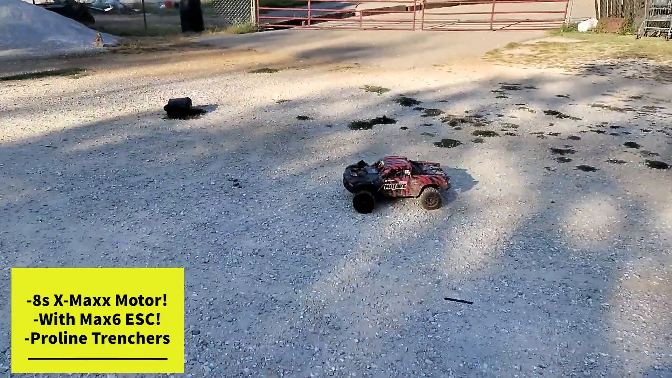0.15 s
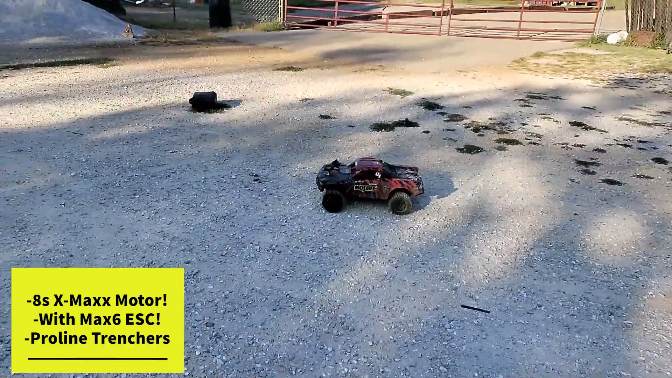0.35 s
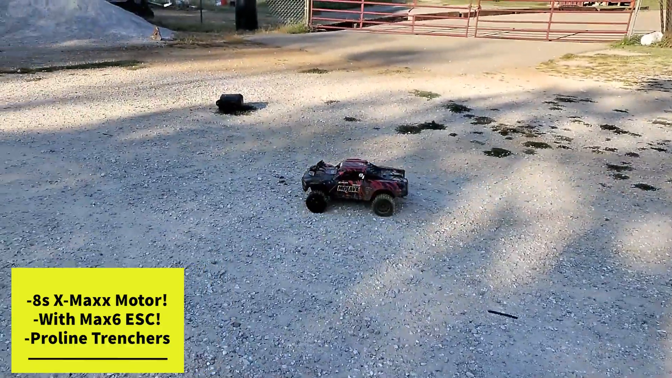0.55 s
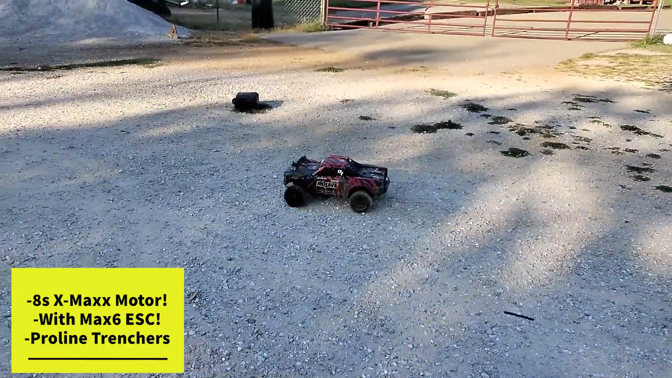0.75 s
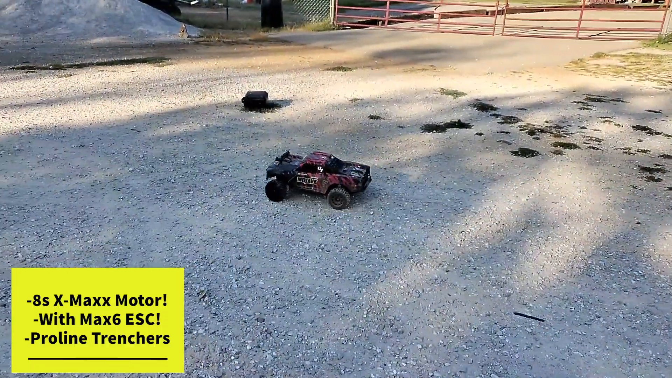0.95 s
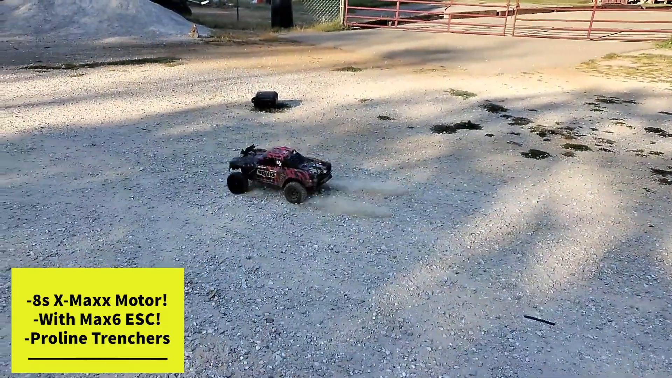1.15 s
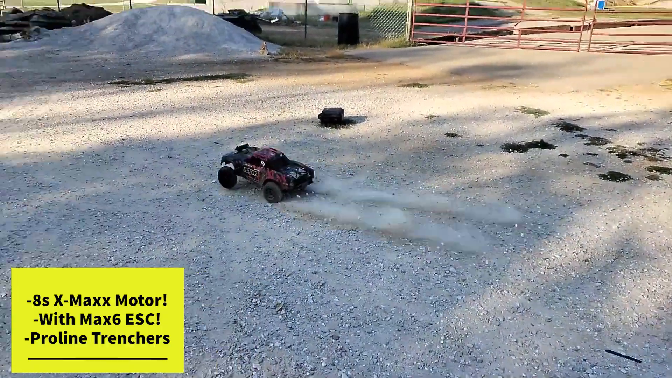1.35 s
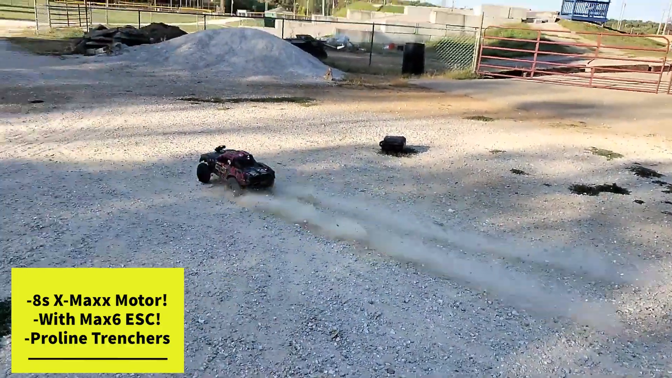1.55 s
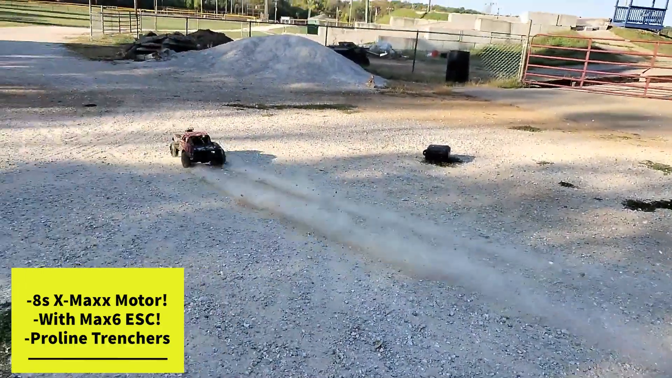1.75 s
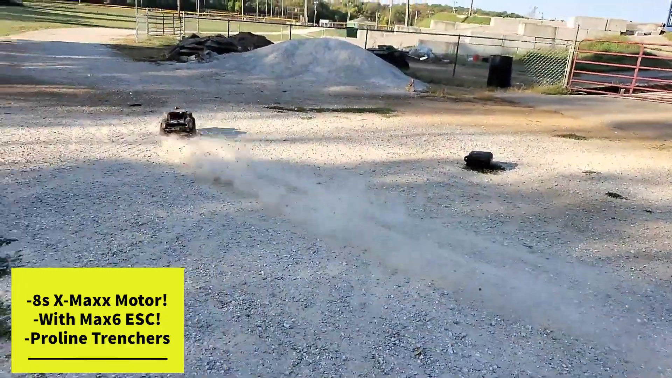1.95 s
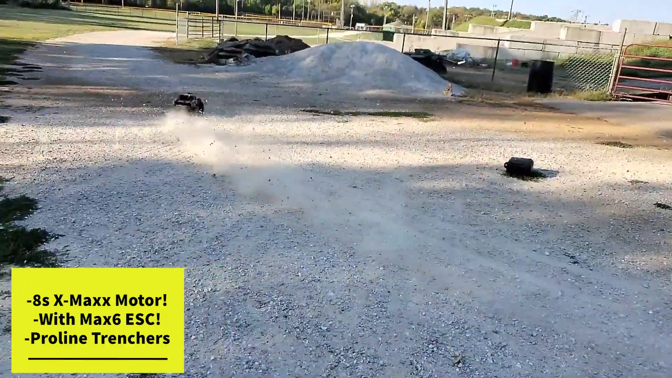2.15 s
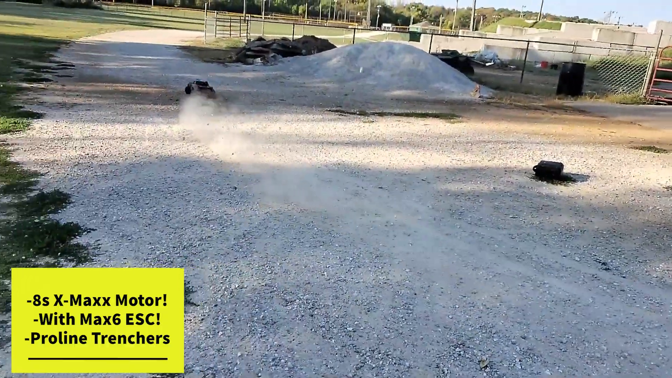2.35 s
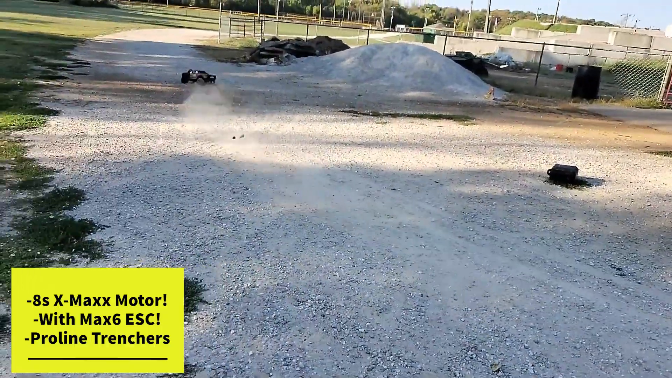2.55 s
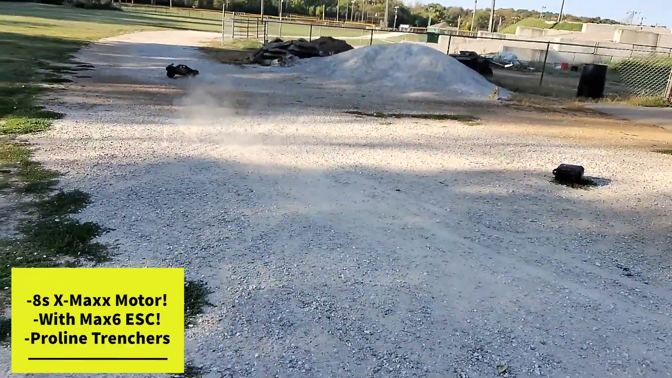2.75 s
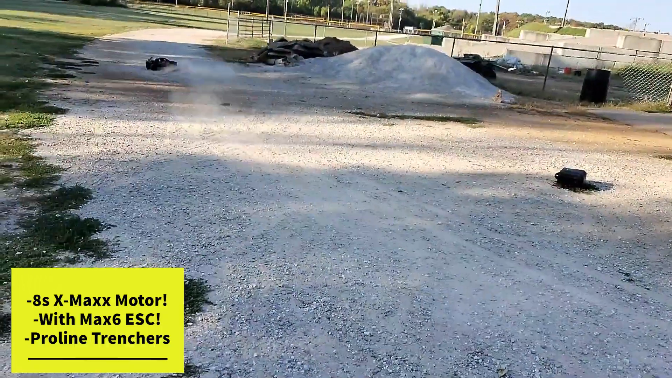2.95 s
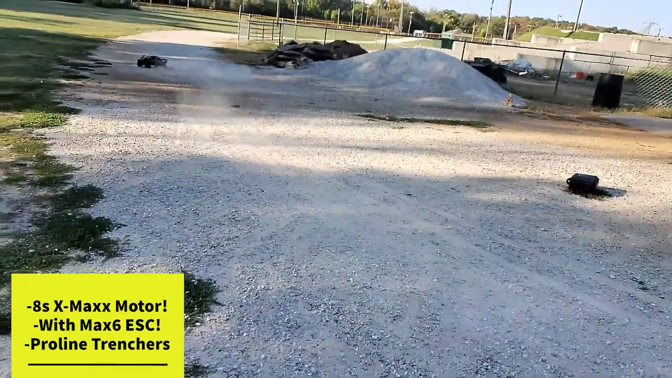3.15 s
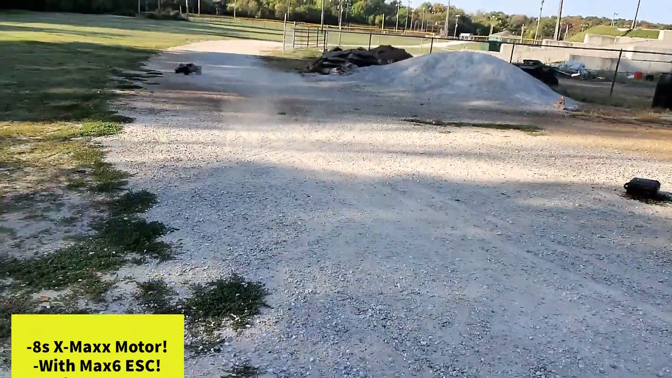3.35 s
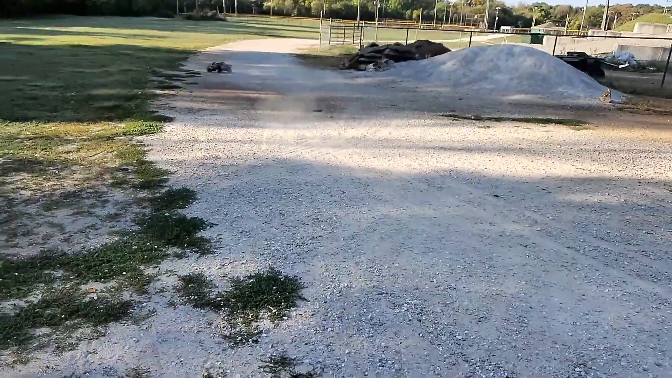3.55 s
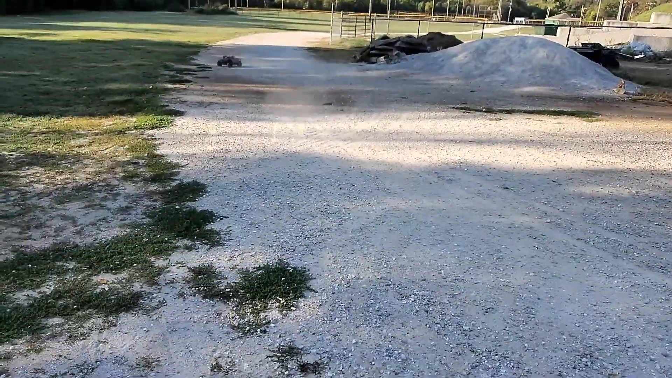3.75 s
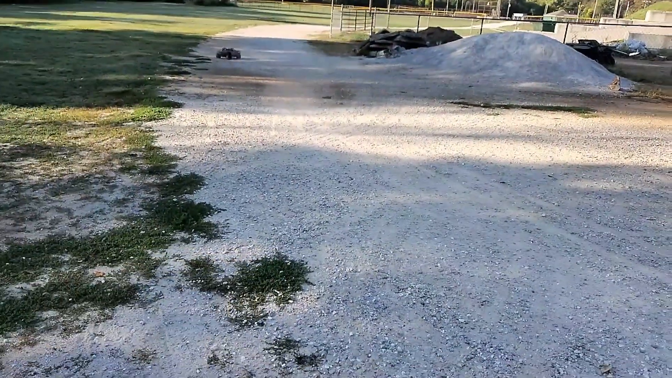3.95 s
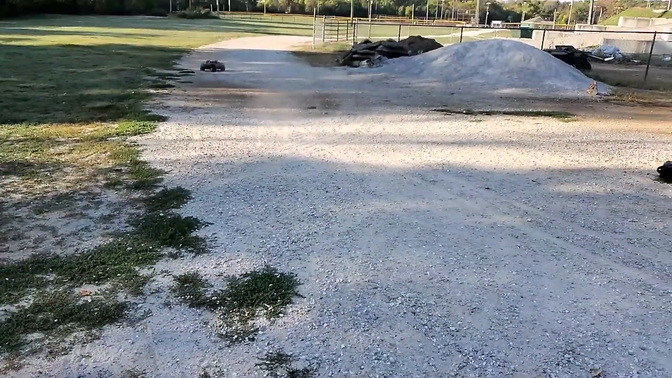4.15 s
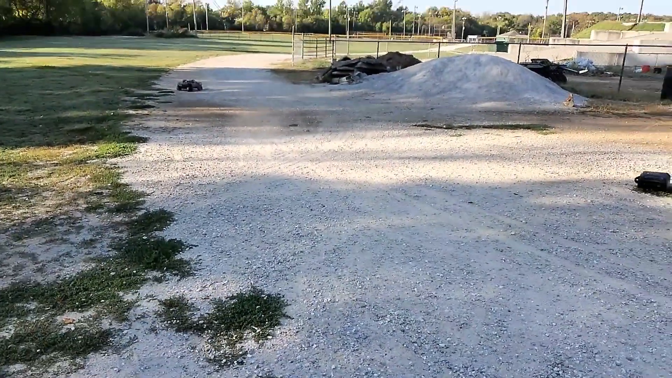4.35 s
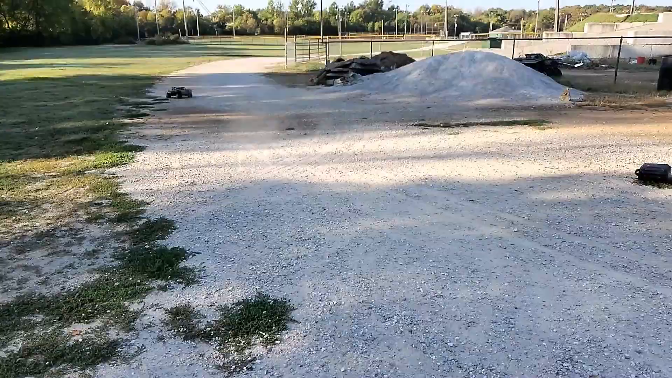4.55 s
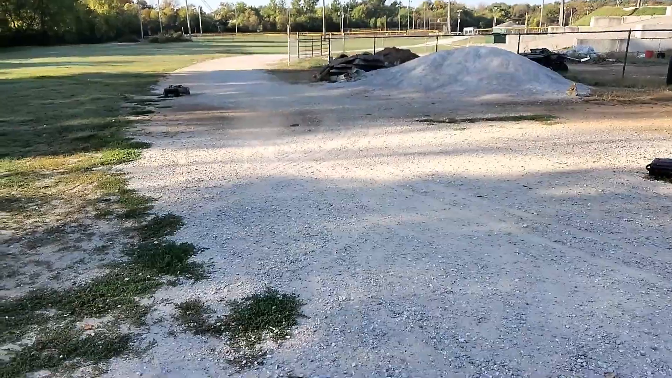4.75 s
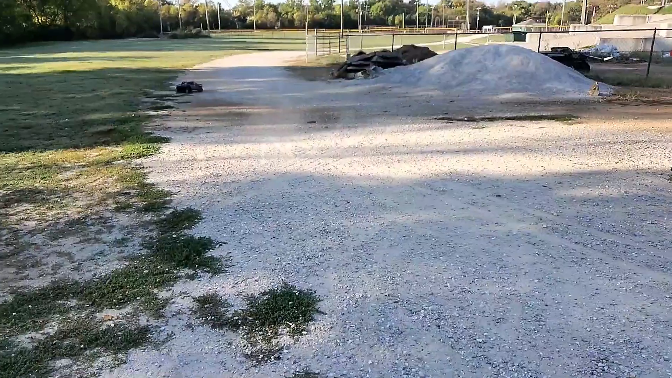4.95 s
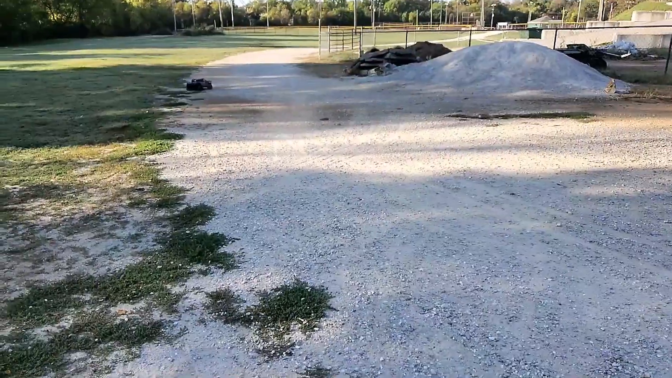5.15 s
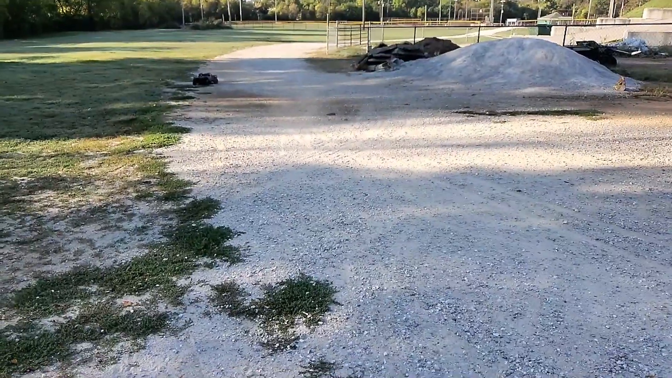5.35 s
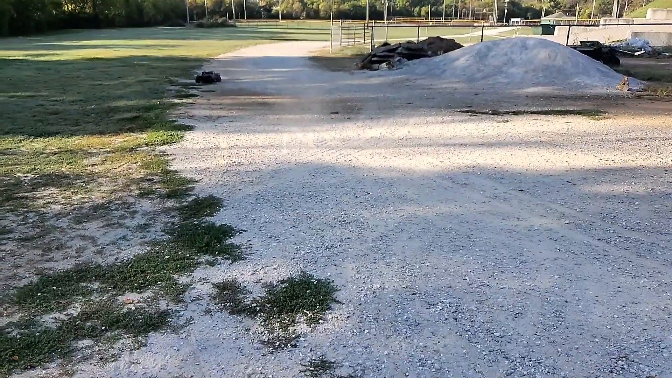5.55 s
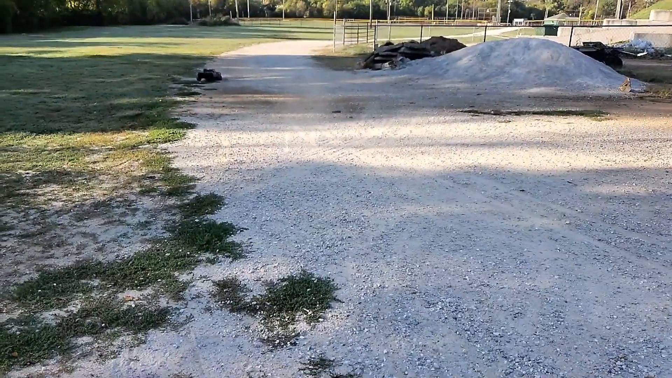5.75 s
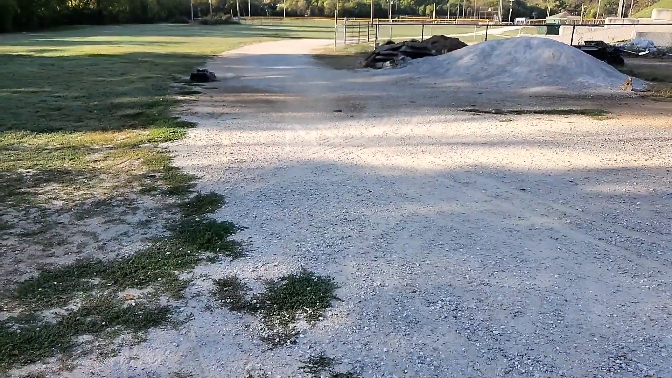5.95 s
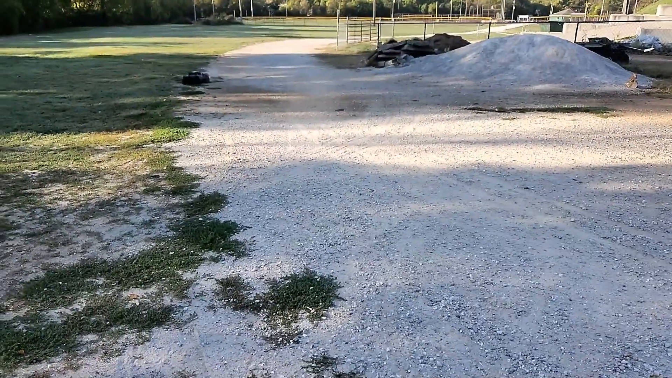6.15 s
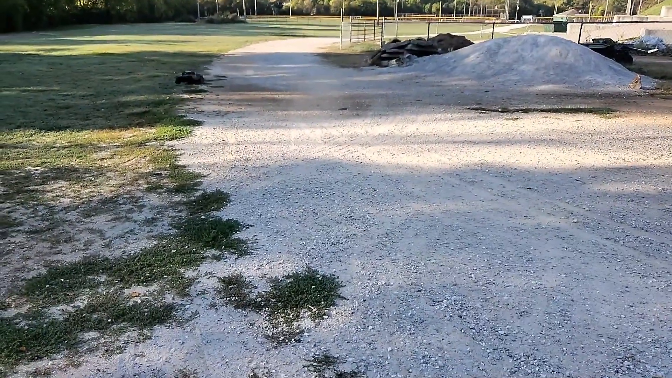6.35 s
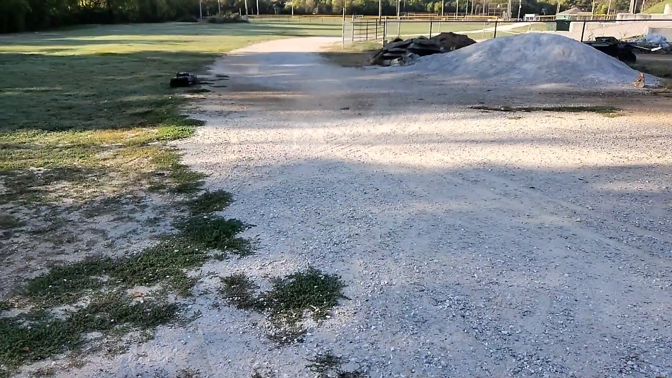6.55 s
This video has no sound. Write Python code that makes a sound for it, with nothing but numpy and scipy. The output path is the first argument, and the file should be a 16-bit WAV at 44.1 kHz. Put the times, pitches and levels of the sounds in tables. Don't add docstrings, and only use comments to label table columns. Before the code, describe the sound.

A brief skid and clacking stones open close to the phone, with quiet rolling and a thin insect buzz. About a second in, hollow tyres spin hard, spraying gravel for a second while the gears whine upward. Grit rains and bright pebbles click close by. Far away, small throttle bursts crunch with dull clacks over low traffic rumble in the open air.

```python
import sys
import numpy as np
from scipy import signal
from scipy.fft import rfft, irfft
from scipy.io import wavfile
from scipy.ndimage import uniform_filter1d

SR = 44100
rng = np.random.default_rng(int(sys.argv[2]) if len(sys.argv) > 2 else 0)


def put_to_file(sound):
    columns = np.atleast_2d(sound).T
    safe = np.clip(columns, -1, 1)
    whole_steps = np.round(safe * 32767)
    wavfile.write(sys.argv[1], SR, whole_steps.astype(np.int16))


def gain_from_db(level_db):
    decades = np.asarray(level_db, float) / 20
    return 10 ** decades


N = 291060
TIME = np.arange(N) / SR
HZ = np.fft.rfftfreq(N, 1 / SR) + 1

# (time [s], crunch level [dB])
WHEELSPIN = [(0.95, -63.5), (1.02, -31), (1.28, -25.5), (1.4, -26.5), (1.6, -25.5), (1.9, -27.5),
             (2.08, -36), (2.19, -69.5), (2.25, -80)]
# (time [s], crunch level [dB])
ROLLING = [(0.0, -49), (0.5, -46), (0.95, -46.5), (2.0, -41), (2.7, -45.5), (3.15, -50), (3.55, -59),
           (4.2, -69), (4.9, -59), (5.5, -58), (6.6, -55)]
# (frequency [Hz], density [dB per Hz])
HOLLOW = [(50, -35), (110, -7), (220, 2.5), (300, -6), (380, -13.5), (600, -45)]


def unit(x):
    return x / np.sqrt(np.mean(x ** 2))


def across(table, column=1):
    table = np.array(table)
    return np.interp(np.log(HZ), np.log(table[:, 0]), table[:, column])


def along(table, off_db=None):
    s, *columns = np.transpose(table)
    return [np.interp(TIME, s, c, off_db, off_db) for c in columns]


def colour(x, spectrum):
    return unit(irfft(rfft(x) * gain_from_db(across(spectrum)), N))


def walk(rate):
    k = int(SR / rate)
    levels = np.repeat(rng.standard_normal(N // k + 1), k)
    return 1.61 * uniform_filter1d(uniform_filter1d(levels, k), k)[:N]


def held(s, length, db, rise_db_s, fall_db_s):
    down_db = rise_db_s * np.maximum(s - TIME, 0) + fall_db_s * np.maximum(TIME - s - length, 0)
    gain, on = np.zeros(N), down_db < 70
    gain[on] = gain_from_db(db - down_db[on])
    return gain


def power(*gains):
    return np.sqrt(sum(g ** 2 for g in gains))


def grains(rate, lump_db):
    luck = rng.random((3, N)) * SR / rate
    hit = luck < 1
    size = hit * rng.standard_normal((3, N))
    rarity = np.minimum(-np.log(luck[hit] + 1e-9), 4)
    size[hit] *= gain_from_db(np.broadcast_to(lump_db, (3, N))[hit] * rarity)
    steep = np.clip(lump_db * np.log(10) / 10, 0, 0.9)
    return size * np.sqrt((1 - steep) * SR / rate)


def ports(common, left, right, like=1.0):
    # (frequency [Hz], left minus right [dB], likeness [0-1], left leads by [rad])
    port_pair = [(61, 0, 0.96, 0), (200, -2, 1, -0.76), (600, -1, 0.92, -0.17), (1740, -6.5, 0.82, 1.52),
                 (2840, -1, 0.1, 3.5), (3820, 0.5, 0.1, 1), (4840, -5, 0.42, 3), (6460, -7, 0, 3.5),
                 (8000, -6, 0.44, 4), (8750, -6, 0.7, 2.5), (9450, -2.5, 0, 6.5), (13600, -2.5, 0.6, 4.5)]
    likeness = np.clip(like * across(port_pair, column=2), 0, 1)
    gain = gain_from_db(across(port_pair) / 2)
    late = np.exp(-1j * across(port_pair, column=3))
    shared, apart = np.sqrt(likeness) * rfft(common), np.sqrt(1 - likeness)
    at_left = gain * (shared + apart * rfft(left))
    at_right = (shared * late + apart * rfft(right)) / gain
    return np.array([irfft(at_left, N), irfft(at_right, N)])


def traffic():
    # (frequency [Hz], density [dB per Hz])
    road_spectrum = [(15, -64), (25, -5), (164, -0.5), (410, -16), (598, -15.5), (997, -23), (1850, -25.5),
                     (2700, -40), (4870, -45.5), (6380, -77), (9550, -63), (13500, -65), (15500, -79)]
    level_db, rise_db_s, drone_db, road_db = -45, 0.5, -5.5, 4.0
    duck_db, duck_from_s, duck_deepest_s = 6.5, 1.15, 0.87
    late = np.maximum(TIME - duck_from_s, 0) / duck_deepest_s
    duck = duck_db * late ** 2 * np.exp(2 - 2 * late)
    swell = gain_from_db(level_db + rise_db_s * TIME - duck + walk(8.7))
    drone = swell * gain_from_db(drone_db) * colour(rng.standard_normal((3, N)), HOLLOW)
    road = swell * gain_from_db(road_db) * colour(rng.standard_normal((3, N)), road_spectrum)
    all_round = across([(150, 1.0), (300, 0.67), (700, 0.028)])
    return ports(*drone) + ports(*road, like=all_round)


def insect(phrases, hz, width_hz, throb_hz, depth):
    rise_db_s, fall_db_s = 87, 55.5
    level = sum(held(*row, rise_db_s, fall_db_s) for row in phrases)
    throb = 1 + depth * np.sin(2 * np.pi * throb_hz * TIME + 2 * walk(12.0))
    mode = [(hz - 4 * width_hz, -40), (hz - width_hz, -8), (hz, 0),
            (hz + width_hz, -8), (hz + 4 * width_hz, -40)]
    return ports(*(level * throb * colour(rng.standard_normal((3, N)), mode)))


def ring(hz, t60):
    t = np.arange(int(t60 * SR)) / SR
    return np.sin(2 * np.pi * hz * t) * 1000. ** (-t / t60)


def add(out, s, sound):
    i = int(s * SR)
    out[:, i:i + sound.shape[1]] += sound[:, :N - i]


def stones():
    # (time [s], peak [dB], low knock re peak [dB])
    pebbles = [(0.3962, -70, -5), (0.4329, -46, -4), (0.842, -42, -5), (2.009, -21, -17),
               (2.0991, -18.5, -18), (2.6963, -31, -22), (2.2852, -33, -19), (2.328, -30, -28),
               (2.3367, -23.5, -30), (2.3764, -25, -15), (2.4064, -24, -21), (2.4224, -24.5, -24),
               (2.4852, -26, 8.5), (2.5064, -27, -21), (2.5164, -25, -22), (2.5296, -26, -35),
               (2.5397, -24, -25), (2.5865, -31, -21), (2.6135, -30, -23), (2.6504, -25, -22),
               (2.9991, -29, -27), (3.141, -33.5, -25), (3.1677, -31, -19), (3.1903, -31, -17),
               (3.268, -35, -9), (3.5472, -39, -20), (3.8172, -42, 14.5), (4.7192, -35, -13),
               (5.437, -35.5, 0), (6.357, -40, -13)]
    # (time [s], peak [dB], ring [Hz], t60 [s])
    clacks = [(0.002, -25.5, 600, 0.034), (0.036, -30, 620, 0.065), (0.054, -51, 577, 0.079),
              (0.11, -31, 680, 0.016), (0.984, -38, 580, 0.034), (2.074, -32, 450, 0.041),
              (2.221, -32.5, 583, 0.11), (3.727, -54, 458, 0.04), (3.848, -39.5, 810, 0.036),
              (3.873, -39, 546, 0.04), (3.904, -39, 900, 0.044), (3.915, -41.5, 740, 0.032),
              (3.942, -39, 645, 0.029), (3.986, -36, 1680, 0.018), (4.009, -38, 452, 0.023),
              (4.283, -36.5, 640, 0.04), (4.644, -35, 590, 0.061), (4.667, -33, 575, 0.077),
              (4.973, -38, 600, 0.038), (5.325, -45, 525, 0.04), (5.501, -46, 626, 0.04),
              (5.749, -29, 610, 0.08)]
    pebble_hz, spread = 11840, 0.055
    out = np.zeros((2, N))
    side = gain_from_db([[-2.5], [2.0]])
    fade = np.exp(-np.arange(200) / 28.)
    chips = np.diff(rng.standard_normal((len(pebbles), 2, 201))) * fade
    for (s, db, low_db), chip in zip(pebbles, chips):
        hz = pebble_hz * (1 + spread * rng.standard_normal())
        add(out, s, side * gain_from_db(db - 4) * ring(hz, 0.004))
        add(out, s, side * gain_from_db(db - 3) * chip)
        add(out, s, side * gain_from_db(db + low_db) * ring(1900, 0.00083))
    for s, db, hz, t60 in clacks:
        add(out, s, gain_from_db(db) * np.ones((2, 1)) * ring(hz, t60))
        add(out, s, side * gain_from_db(db) * ring(1320, 0.0051))
    return signal.sosfilt(signal.butter(6, 14600, fs=SR, output="sos"), out)


def gears(wobble=0.01, flutter_db=2.5):
    # (time [s], mesh frequency [Hz])
    launch = [(1.13, 4650), (1.155, 4850), (1.19, 5450), (1.23, 5850), (1.27, 6050), (1.305, 6500),
              (1.335, 7200), (1.375, 9100)]
    # (time [s], length [s], from [Hz], to [Hz], tone level [dB])
    revs = [
        (2.78, .05, 4500, 5600, -58),
        (5.83, .085, 4650, 5700, -53),
        (5.9, .06, 4890, 4860, -56),
    ]
    # (time [s], length [s], from [Hz], to [Hz], tone level [dB])
    whines = [
        (1.34, .64, 9830, 9700, -41),
        (1.57, .1, 8750, 9600, -39),
        (2.0, .2, 9650, 9400, -57),
        (2.78, .28, 9480, 9470, -58),
        (5.785, .04, 9500, 12400, -59),
    ]
    # (frequency [Hz], gain [dB])
    casing = [(4300, -6), (4800, 4), (5400, -5), (6000, 0), (7200, -3), (8500, -2), (9700, 0), (14000, 1)]
    launch_db, octave_db, edge_db_s = -42, 5, 600
    surges = [(launch, launch_db, True)]
    for rows, has_octave in [(revs, True), (whines, False)]:
        for s, length, hz, end_hz, db in rows:
            surges.append(([(s, hz), (s + length, end_hz)], db, has_octave))
    slip = 1 + wobble * walk(500) + 0.004 * walk(60)
    flutter = gain_from_db(flutter_db * walk(70)) * (1 + 0.5 * walk(300))
    smear = gain_from_db(octave_db + flutter_db * walk(80)) * walk(1600)
    out = np.zeros(N)
    for speed, db, has_octave in surges:
        start, end = speed[0][0], speed[-1][0]
        gain = held(start, end - start, db, edge_db_s, edge_db_s)
        on = gain > 0
        phase = 2 * np.pi * np.cumsum((along(speed)[0] * slip)[on]) / SR
        octave = has_octave * smear[on] * np.sin(2 * phase)
        out[on] += gain[on] * (flutter[on] * np.sin(phase) + octave)
    out = irfft(rfft(out) * gain_from_db(across(casing)), N)
    return gain_from_db([[0], [4.5]]) * np.array([out, np.roll(out, 1)])


def near():
    far_from_s, far_by_s = 0.59, 4.1
    return np.interp(TIME, [far_from_s, far_by_s], [1, 0])


def stabs(gritty):
    # (full at [s], held [s], crunch level [dB], grit re crunch [dB])
    throttle = [(0.11, 0.014, -48.5, -13), (2.79, 0.027, -39, -7.5), (2.99, 0.025, -46, -7.5),
                (3.25, .03, -48.5, -13), (3.86, 0.037, -52.5, -18), (3.97, 0.091, -54.5, -29),
                (4.322, 0.046, -41, -21), (4.42, 0.024, -53, -2.5), (4.599, 0.011, -46, -13.5),
                (4.659, 0.034, -42, -11), (4.88, .02, -55, -20), (5.722, 0.11, -41.5, -16.5),
                (5.848, 0.092, -37.5, -9.5), (6.02, 0.037, -56, -4)]
    # (full at [s], held [s], crunch level [dB], grit re crunch [dB])
    skids = [
        (0.0, 0.0069, -39, -8),
        (0.036, 0.025, -38, -14),
    ]
    rise_db_s, fall_db_s, skid_edge_db_s = 267, 119, 900
    quick = 1.2 ** gritty
    rows = [(row, quick * rise_db_s, quick * fall_db_s) for row in throttle]
    rows += [(row, skid_edge_db_s, skid_edge_db_s) for row in skids]
    return power(*(held(s, hold, db + gritty * grit_db, rise, fall)
                   for (s, hold, db, grit_db), rise, fall in rows))


def grit():
    # (frequency [Hz], density [dB per Hz])
    sand_spectrum = [(1500, 5), (3600, -5), (4600, 4), (6000, -1), (7500, -13), (9000, -18.5), (11000, -33)]
    dust_spectrum = [(5000, -14.5), (8000, -4.5), (9800, 4), (11000, 2.5), (13000, 2), (14400, 6),
                     (14900, -18.5)]
    spray_db, spray_from_s, spray_build_s, spray_lag_s = -11, 0.83, 0.14, 0.044
    rain_db, rain_peak_s, rain_thins_db_s2 = -46, 2.18, 11
    roll_db, near_puff_db = -15, 2
    spray_sand_db, stab_sand_db, rain_sand_db, roll_sand_db, far_sand_db = 1.5, 4.5, -3, -2.5, -5
    ticks_per_s, tick_db = 60, -5

    build = 1 - np.exp(-np.maximum(TIME - spray_from_s, 0) / spray_build_s)
    spin = gain_from_db(along(WHEELSPIN, off_db=-120)[0] + spray_db)
    spray = np.maximum(spin, np.roll(spin, int(spray_lag_s * SR))) * build
    stab = stabs(0.97)
    rain = gain_from_db(rain_db - rain_thins_db_s2 * (TIME - rain_peak_s) ** 2) * build
    roll = gain_from_db(along(ROLLING)[0] + roll_db + near_puff_db * near() * walk(35))
    far = gain_from_db(far_sand_db * (1 - near()))
    dust = power(spray, stab, rain, roll)
    sand = power(spray * gain_from_db(spray_sand_db), far * stab * gain_from_db(stab_sand_db),
                 rain * gain_from_db(rain_sand_db), far * roll * gain_from_db(roll_sand_db))
    falling = power(rain, roll)
    lump_db = 3 * (falling / dust) ** 2
    shower = grains(6000, lump_db)
    mix = dust * colour(shower, dust_spectrum) + sand * gain_from_db(walk(24.9)) * colour(shower, sand_spectrum)
    handfuls_db = 1.1 * lump_db * np.clip(walk(40), -2, 1.3)
    ticks = falling * gain_from_db(tick_db) * colour(grains(ticks_per_s, 3), dust_spectrum)
    return ports(*(gain_from_db(walk(60) + handfuls_db) * mix + ticks))


def tyres():
    # (frequency [Hz], density [dB per Hz])
    body_spectrum = [(250, -61), (360, -11.5), (520, 2), (680, -3), (850, -13.5), (1300, -29.5)]
    chassis_spectrum = [(600, -10), (1000, -6), (1230, -1.5), (1480, -12.5), (1750, -2), (2050, -10.5),
                        (2300, -10), (2900, -17), (3700, -17), (6000, -80.5)]
    spin_upper_db, spin_thump_db, tail_upper_db_s, tail_thump_db_s = -1, -1.5, -5, -8
    stab_upper_db, stab_thump_db, roll_upper_db, roll_thump_db = -4, -3.5, -10, -5.5
    near_upper_db = 3.5
    spin = gain_from_db(along(WHEELSPIN, off_db=-120)[0])
    stab = stabs(0)
    roll = gain_from_db(along(ROLLING)[0])
    since = TIME - WHEELSPIN[1][0]
    crawl_upper = power(stab * gain_from_db(stab_upper_db), roll * gain_from_db(roll_upper_db))
    upper = power(spin * gain_from_db(spin_upper_db + tail_upper_db_s * since),
                  gain_from_db(near_upper_db * near()) * crawl_upper)
    low = power(spin * gain_from_db(spin_thump_db + tail_thump_db_s * since),
                stab * gain_from_db(stab_thump_db), roll * gain_from_db(roll_thump_db))
    body = power(spin, stab, roll) * colour(grains(2000, 0.3), body_spectrum)
    chassis = upper * gain_from_db(1.6 * walk(25)) * colour(grains(4000, 0.83), chassis_spectrum)
    thump = low * colour(grains(1200, 0.68), HOLLOW)
    return ports(*(gain_from_db(0.34 * walk(30)) * (body + chassis + thump)))


def scene():
    # (time [s], length [s], level [dB])
    katydid_phrases = [
        (0.0, 0.74, -58),
        (4.7, 0.3, -66.5),
        (6.05, 0.43, -61),
    ]
    cricket_phrases = [
        (5.25, 0.27, -70),
    ]
    # (frequency [Hz], gain [dB])
    ground = [(2100, 0), (2900, -5.5), (3900, -4), (4700, 0), (5800, -1.5), (6500, -5.5), (7300, 0)]
    katydid = insect(katydid_phrases, 9520, width_hz=76, throb_hz=21.86, depth=0.45)
    cricket = insect(cricket_phrases, 4480, width_hz=300, throb_hz=35, depth=0.26)
    truck = tyres() + grit()
    distant = irfft(rfft(truck) * gain_from_db(across(ground)), N)
    truck = near() * truck + (1 - near()) * distant
    return truck + gears() + stones() + katydid + cricket + traffic()


def squeeze(x, whim_db=3.0):
    # (frequency [Hz], density [dB per Hz])
    mask = [(1800, -125), (2600, -96), (3000, -92), (3800, -91), (4300, -98), (5500, -101), (6500, -94),
            (8100, -96), (8600, -90), (8950, -89), (9200, -112), (14500, -112), (14800, -60)]
    hz, _, bins = signal.stft(x, SR, nperseg=2048, scaling="psd")
    density = 2 * uniform_filter1d(np.abs(bins) ** 2, size=5, axis=1)
    loud_db = 10 * np.log10(density[:, hz > 400].sum(axis=1).mean(axis=0) * hz[1] + 1e-12)
    whim = uniform_filter1d(rng.standard_normal((65, len(loud_db))), size=4, axis=1) * 2
    whim = np.repeat(whim, 16, axis=0)[:len(hz)]
    follow = np.interp(hz, [4200, 5500], [1.3, 1.05])
    edge = np.resize(np.diff(x[1], n=2) ** 2, (len(loud_db), 1024))
    sharp = edge.max(axis=1) > 80 * edge.mean(axis=1)
    sharp = sharp | np.roll(sharp, 1)
    mask_db = np.interp(hz, *np.transpose(mask))[:, None] + follow[:, None] * (loud_db + 40)
    mask_db = mask_db + whim_db * whim - 30 * sharp
    keep = np.where(density > gain_from_db(2 * mask_db), 1, gain_from_db(-55))
    return signal.istft(bins * keep, SR, nperseg=2048, scaling="psd")[1][:, :N]


def top_cut(x):
    return signal.sosfilt(signal.butter(12, 15680, fs=SR, output="sos"), x)


def record(dry):
    heard = signal.sosfilt(signal.butter(3, 45, "high", fs=SR, output="sos"), dry)
    return top_cut(squeeze(heard))


dry = scene()
out = record(dry)
put_to_file(out)
```